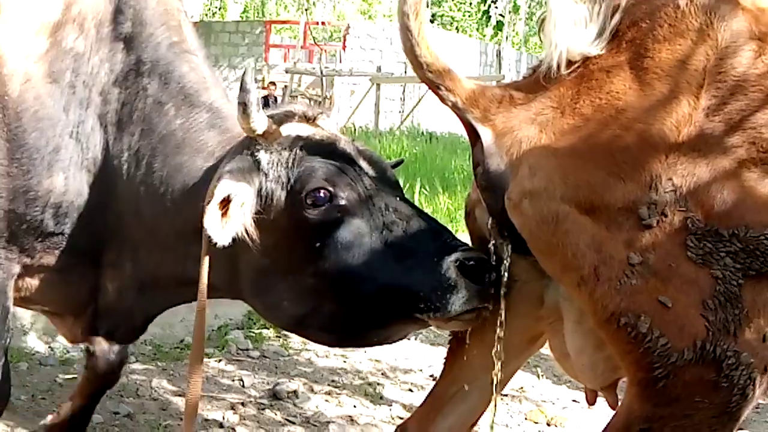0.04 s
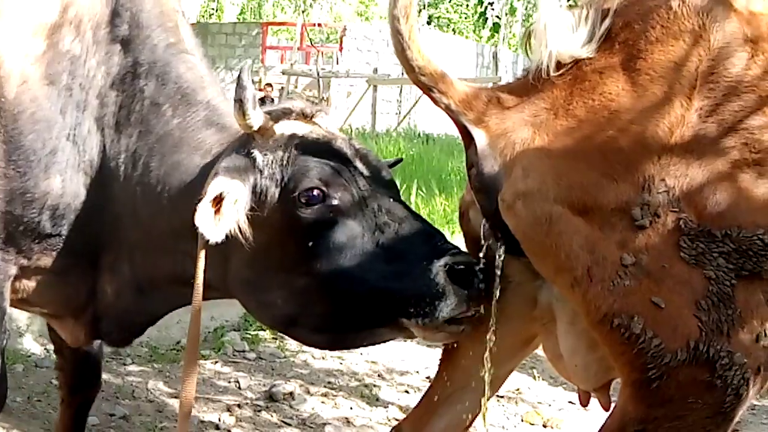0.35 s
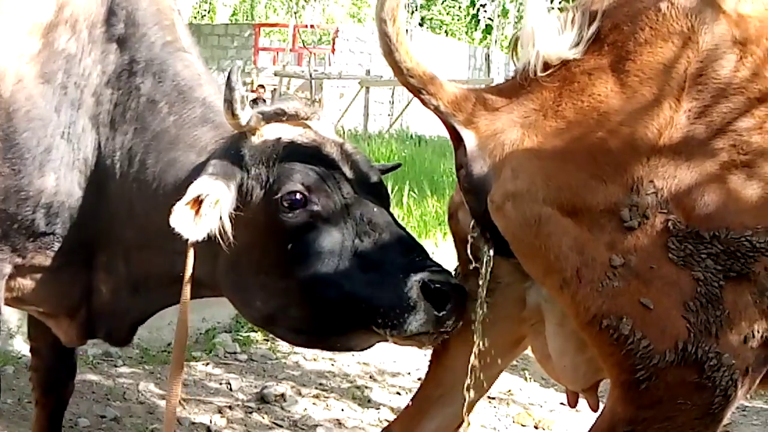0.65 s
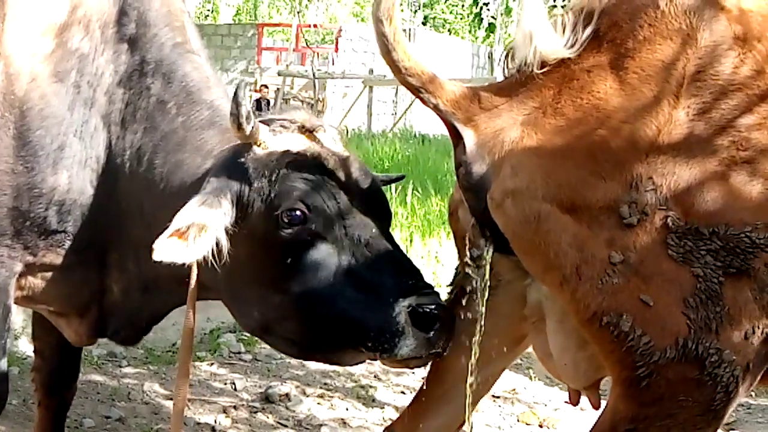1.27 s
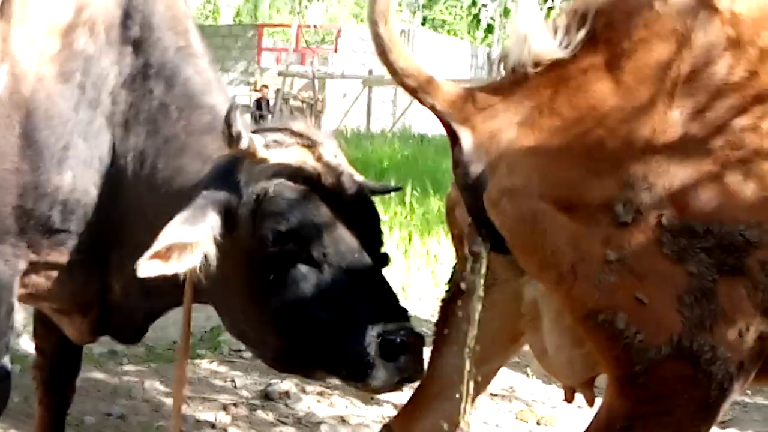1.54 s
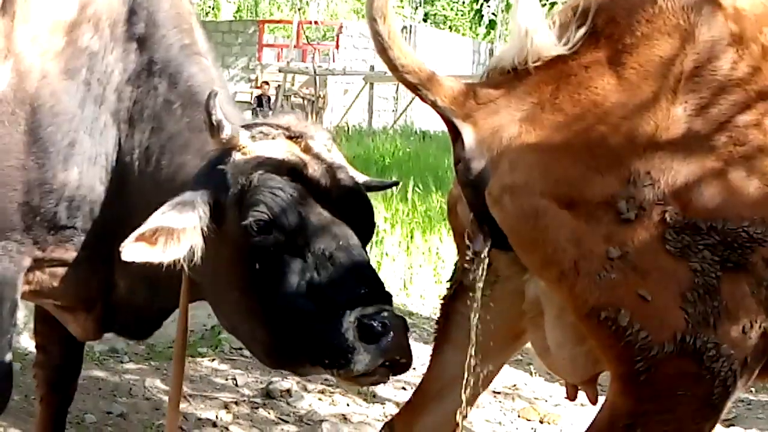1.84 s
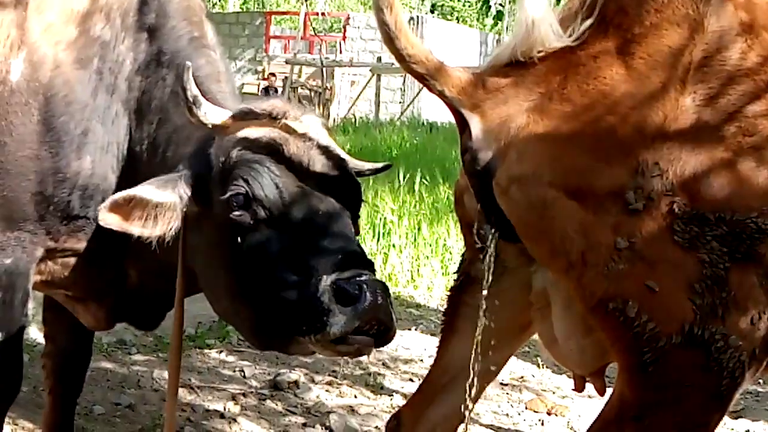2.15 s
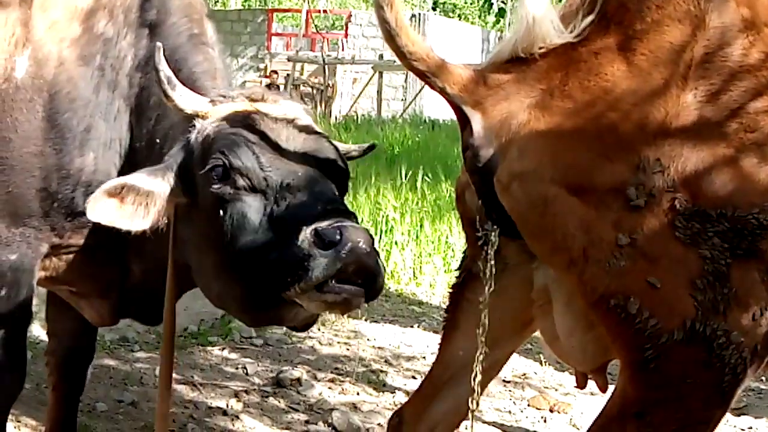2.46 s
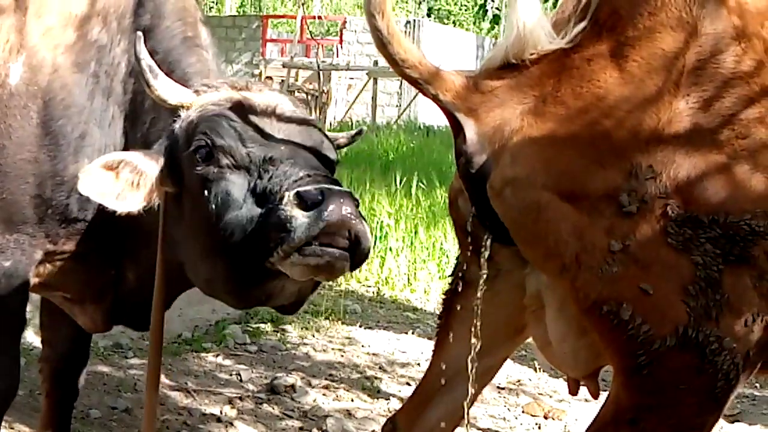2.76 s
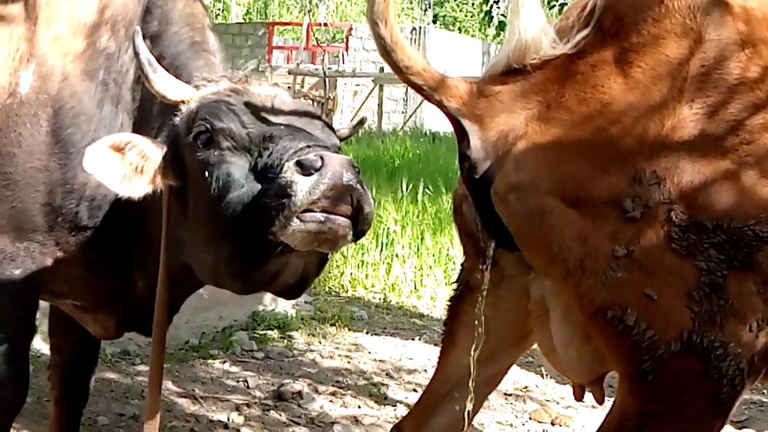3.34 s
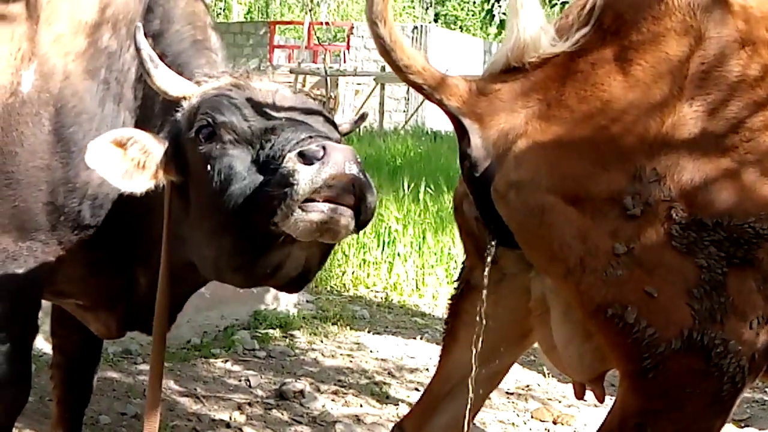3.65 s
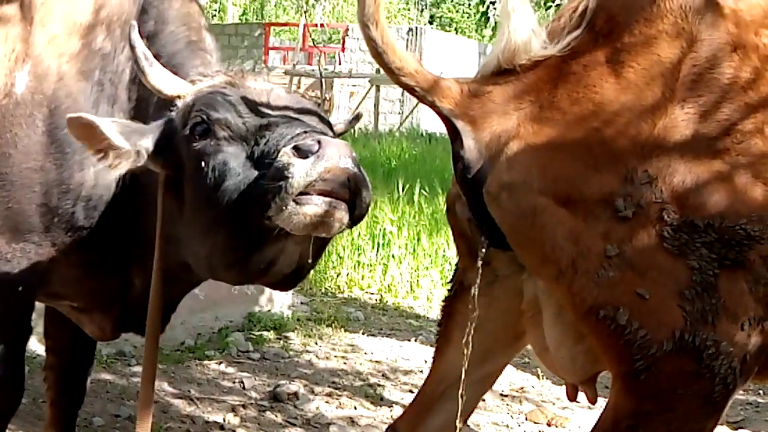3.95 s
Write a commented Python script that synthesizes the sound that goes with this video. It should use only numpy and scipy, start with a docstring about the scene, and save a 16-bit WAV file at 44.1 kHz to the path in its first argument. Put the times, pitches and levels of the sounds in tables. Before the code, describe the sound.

A cow urinates onto packed earth in a farmyard, heard close to the ground. The stream patters and splashes throughout, with fine spray, small plops and dull clicks, over faint cow puffs and a low rumble, easing at the end.

```python
"""A farmyard, one microphone close to the ground: a cow urinates onto the packed earth.
From the start the stream breaks into drops that smack on wet ground, throw fine spray and plop into
the puddle, over a faint low rumble; a near wall reflects the splashing. A second cow noses at the
stream, and the animals make soft puffs, shuffles and dull clicks. Spatter flares near 0.9 s, then come
a few bright bubble plinks. The puddle goes quiet around 3 s and returns; the flow eases at the end."""
import sys
import numpy as np
from scipy import signal
from scipy.fft import rfft, irfft
from scipy.io import wavfile

SR = 44100
rng = np.random.default_rng(int(sys.argv[2]) if len(sys.argv) > 2 else 0)


def persist_wave(psi):
    """Save psi, clipped to +-1, as 16-bit WAV."""
    counts = np.round(np.clip(psi, -1, 1) * 32767).astype(np.int16)
    wavfile.write(sys.argv[1], SR, np.atleast_2d(counts).T)


N = 176400
TIME = np.arange(N) / SR


def from_db(db):
    """Decibels to gain."""
    return 10 ** (np.asarray(db) / 20)


def unit_rms(x):
    """Scale to unit rms."""
    return x / np.sqrt(np.mean(x ** 2) + 1e-20)


def gain_curve(rows):
    """Gain over time from rows of time_s, level_db."""
    return from_db(np.interp(TIME, *np.transpose(rows)))


def swell(middle_s, half_s):
    """A bell-shaped rise and fall."""
    return np.exp(-.5 * ((TIME - middle_s) / half_s) ** 2)


def add(out, start_s, x):
    """Mix x in at start_s."""
    i = int(np.clip(start_s * SR, 0, N - 1))
    out[i:i + len(x)] += x[:N - i]


def lowpass(x, top_hz):
    """Gently dull the treble."""
    return signal.sosfilt(signal.butter(2, top_hz, fs=SR, output="sos"), x)


def colour(x, spectrum):
    """Causal (minimum-phase) filter that keeps the power of white noise."""
    size = 2 * N
    hz, db = np.transpose(spectrum)
    bin_hz = np.arange(N + 1) * SR / size
    gain = unit_rms(from_db(np.interp(np.log(bin_hz + 1), np.log(hz), db)))
    cepstrum = irfft(np.log(gain))
    cepstrum[1:N] *= 2
    cepstrum[N + 1:] = 0
    return irfft(rfft(x, size) * np.exp(rfft(cepstrum)))[:N]


def resonate(x, hz, width_hz):
    """One resonance, gain 1 at its peak."""
    radius = np.exp(-np.pi * width_hz / SR)
    feedback = [1, -2 * radius * np.cos(2 * np.pi * hz / SR), radius ** 2]
    return signal.lfilter(np.array([1, 0, -1]) * (1 - radius ** 2) / 2, feedback, x + 1e-18)


def grains(per_s, spread_db):
    """Random clicks of uneven size."""
    sizes = from_db(spread_db * np.minimum(rng.exponential(1, N), 4)) * rng.choice([-1, 1], N)
    return sizes * (rng.random(N) < per_s / SR)


def crackle(per_s, spread_db, decay_s):
    """Droplets landing at random, each a dying burst of noise."""
    t = TIME[:SR // 100]
    landings = grains(per_s, spread_db)
    burst = rng.standard_normal(len(t)) * np.exp(-t / decay_s)
    return unit_rms(signal.fftconvolve(landings, burst)[:N])


def ring(hz, width_hz, t):
    """A tone whose phase wanders as the water moves, blurring it to the given width."""
    wander = np.cumsum(rng.standard_normal(len(t))) * np.sqrt(2 * np.pi * width_hz / SR)
    return unit_rms(np.sin(2 * np.pi * hz * t + wander))


def smack(pitch_hz, width_hz=1470, ring_share=0.8, decay_s=0.0043):
    """One drop hits wet earth: a sudden short burst, mostly ringing at its own pitch."""
    t = TIME[:SR // 60]
    noise = np.sqrt(1 - ring_share) * rng.standard_normal(len(t))
    tone = np.sqrt(ring_share) * ring(pitch_hz, width_hz, t)
    return (noise + tone) * np.exp(-(t / decay_s) ** 0.97)


# Strength of the stream: time_s, level_db
STREAM_FLOW = [(0.0, -52), (0.25, -52.5), (0.3, -51.5), (0.96, -52.5), (1.4, -55), (1.9, -52), (2.66, -54),
               (3.26, -53.5), (3.88, -55), (4.0, -60.5)]
# Heavy drops on the earth: start_s, relative_level_db, pitch_hz
HEAVY_DROPS = [(0.0443, -41, 5170), (0.1234, -42, 5070), (0.2742, -32, 6400), (0.3005, -36, 5000),
               (0.3232, -33.5, 5870), (0.415, -26.5, 3594), (0.499, -33, 4320), (0.5476, -32, 5640),
               (0.616, -28, 3330), (0.638, -32.5, 6370), (0.6779, -35, 5770), (0.7147, -35.5, 3440),
               (0.7913, -37, 6180), (0.807, -35, 6400), (0.837, -28.5, 4960), (0.8974, -34, 6340),
               (0.9673, -36.5, 5100), (1.0113, -29, 4220), (1.0503, -31.5, 6570), (1.1247, -32.5, 5040),
               (1.1706, -34, 4520), (1.2252, -36.5, 6330), (1.271, -32, 6010), (1.3717, -40, 5000),
               (1.4177, -40.5, 6450), (1.4703, -36.5, 4270), (1.542, -39, 5540), (1.5651, -30, 6320),
               (1.6373, -23, 4030), (1.65, -34, 5700), (1.692, -34, 4360), (1.828, -35, 4340),
               (1.8422, -23.5, 5896), (2.0698, -41, 5800), (2.1198, -35.5, 4230), (2.1898, -32, 5620),
               (2.2116, -36.5, 5100), (2.236, -34, 3330), (2.268, -32, 6170), (2.413, -31.5, 4670),
               (2.4495, -35.5, 4820), (2.4784, -25, 5780), (2.5327, -32.5, 5260), (2.5885, -29, 4790),
               (2.61, -40, 5030), (2.6503, -36, 6550), (2.781, -36, 6070), (2.9274, -36.5, 6140),
               (2.961, -29, 4410), (3.0767, -27, 5580), (3.1546, -32, 6470), (3.1752, -32.5, 6240),
               (3.3567, -33, 6120), (3.4254, -30.5, 5780), (3.4617, -34, 5500), (3.692, -35.5, 6440),
               (3.7516, -35.5, 6300)]
# Tone of the splash on wet ground: frequency_hz, relative_level_db
SPLASH_SPECTRUM = [(300, -34), (650, -26), (1400, -7.5), (1700, -14.5), (2300, -6), (2800, -9), (3350, -3),
                   (3750, -7), (4400, -2.5), (5800, -1.5), (6500, 0), (7100, -8), (8500, -16.5),
                   (10000, -17), (11700, -29), (14000, -17), (15000, -2.5), (16000, -13)]


def stream(drops_per_s=76, low_hz=3040, high_hz=7224):
    """Close to the microphone, heavy drops, ordinary ones and a mist of droplets strike the ground."""
    mist = from_db(-7) * crackle(per_s=900, spread_db=2.5, decay_s=0.0014)
    hiss = from_db(-7.5) * rng.standard_normal(N)
    spatter = unit_rms(grains(per_s=4000, spread_db=3.9)) * spatter_strength()
    heavy, ordinary = np.zeros(N), np.zeros(N)
    for start_s, level_db, pitch_hz in HEAVY_DROPS:
        add(heavy, start_s, from_db(level_db - 12.5) * smack(pitch_hz))
    for k, (jitter, pitch_draw, size_draw) in enumerate(rng.random((int(drops_per_s * N / SR), 3))):
        start_s = (k + 2 * jitter - 1) / drops_per_s   # a loose train, up to one gap early or late
        level_db = -0.5 + 3 * min(-np.log(size_draw), 2.2)
        pitch_hz = low_hz * (high_hz / low_hz) ** pitch_draw
        add(ordinary, start_s, from_db(level_db) * smack(pitch_hz))
    patter = gain_curve(STREAM_FLOW) * (ordinary + lowpass(mist + hiss, top_hz=8300))
    return colour(heavy + spatter + patter, SPLASH_SPECTRUM)


# Tone of the fine spray: frequency_hz, relative_level_db
SPRAY_SPECTRUM = [(4000, -41), (7500, -7.5), (9700, -10.5), (11700, -17), (14000, -8.5), (15000, 6.5),
                  (16000, -5.5)]
# Sharpest ticks of the spray: start_s, level_db, pitch_hz
SPRAY_TICKS = [(.547, -51, 9500), (1.051, -50, 9500), (1.65, -45, 15200), (1.843, -43, 15400),
               (1.8565, -38, 15000), (2.19, -43, 15300), (2.237, -44, 15200), (2.796, -48.5, 9600),
               (3.206, -42, 15400), (3.652, -44.5, 15400), (3.752, -52.5, 9700)]


def spray(decay_s=0.0022, width_hz=950):
    """Tiny droplets thrown up by the splash land around it as separate sharp ticks."""
    t = TIME[:SR // 100]
    strength = gain_curve(STREAM_FLOW) + from_db(-8) * spatter_strength()
    droplets = crackle(per_s=450, spread_db=5, decay_s=decay_s)
    out = from_db(-16) * strength * colour(droplets, SPRAY_SPECTRUM)
    for start_s, level_db, pitch_hz in SPRAY_TICKS:
        tick = ring(pitch_hz, width_hz, t) * np.exp(-t / decay_s)
        add(out, start_s, from_db(level_db) * resonate(tick, pitch_hz, 2 * width_hz))
    return out


# Low patter of the puddle: time_s, relative_level_db
PUDDLE_PATTER = [(0, -63.5), (.12, -58.5), (.35, -68), (.62, -65), (.75, -70), (1.35, -68), (1.5, -65),
                 (1.95, -62.5), (2.25, -67), (2.62, -65.5), (2.9, -88), (3.5, -81), (3.75, -63), (4, -82)]


def puddle(bubble_q=9.6):
    """Small bubbles ring briefly in the puddle under the cow, each at one of sixteen pitches."""
    pitches_hz = np.geomspace(560, 1550, 16)
    clicks = grains(per_s=420, spread_db=4.3)
    pitch_index = rng.integers(0, len(pitches_hz), N)
    bubbles = sum(resonate(clicks * (pitch_index == k), hz, hz / bubble_q) / hz
                  for k, hz in enumerate(pitches_hz))
    return from_db(-3.5) * gain_curve(PUDDLE_PATTER) * unit_rms(bubbles)


# Strength of the background rumble: time_s, level_db
RUMBLE_LEVEL = [(0.0, -66), (0.5, -67), (0.95, -67), (1.45, -75), (1.53, -68), (2.85, -69.5), (2.9, -73.5),
                (3.5, -75), (3.64, -62), (3.72, -70), (4.0, -76)]
# Tone of the rumble: frequency_hz, relative_level_db
RUMBLE_SPECTRUM = [(20, -31), (50, -17.5), (75, -13), (100, 2.5), (112, -2), (124, 4), (145, -3.5),
                   (200, -14), (300, -22), (1000, -30), (4000, -56)]


def rumble():
    """A faint, wavering low background lies under the farmyard."""
    return gain_curve(RUMBLE_LEVEL) * unit_rms(colour(rng.standard_normal(N), RUMBLE_SPECTRUM))


def yard_echoes(x, delay_s=0.007, decay_s=0.026, wall_delay_s=0.013):
    """Ground, animals and a near wall reflect sound to the microphone, its top absorbed."""
    t = TIME[:SR // 4]
    wall = from_db(-8.5) * swell(wall_delay_s, half_s=0.0017)[:len(t)]
    echoes = rng.standard_normal(len(t)) * (np.exp(-t / decay_s) + wall) * (t > delay_s)
    echoes /= np.sqrt(np.sum(echoes ** 2))
    return lowpass(signal.fftconvolve(x, echoes)[:N], top_hz=11100)


# Duller clicks and plops: start_s, level_db, pitch_hz, decay_s
DULL_PLOPS = [(.093, -52, 675, 0.0035), (.888, -41.5, 656, 0.003), (.887, -46, 1330, 0.0047),
              (1.176, -51.5, 1234, 0.014), (1.637, -47.5, 996, 0.0042), (1.918, -43.5, 2490, 0.0034),
              (2.48, -54, 670, 0.0094), (2.613, -53.5, 714, 0.008), (2.783, -47, 1733, 0.0047),
              (3.077, -37.5, 1242, 0.0033), (3.077, -45.5, 2176, 0.0071), (3.091, -46.5, 1440, 0.0032),
              (3.4615, -35.5, 2316, 0.0028), (3.4619, -44, 1510, 0.0026), (3.468, -47.5, 2010, 0.0072)]


def plops():
    """Plops in the puddle and the animals' dull clicks: each a dying burst in one broad resonance."""
    out, t = np.zeros(N), TIME[:SR // 12]
    for start_s, level_db, pitch_hz, decay_s in DULL_PLOPS:
        width_hz = 0.23 * pitch_hz
        tone = unit_rms(resonate(ring(pitch_hz, width_hz, t), pitch_hz, 2 * width_hz))
        add(out, start_s, from_db(level_db) * tone * np.exp(-t / decay_s))
    return out


# Puffs and shuffles of the cows: middle_s, half_length_s, level_db, top_hz
COW_PUFFS = [(0.148, 0.063, -66, 900), (0.498, 0.055, -52, 560), (0.928, 0.045, -66.5, 590),
             (1.481, 0.027, -65, 710), (1.955, 0.056, -65.5, 825), (3.674, 0.12, -77.5, 800)]
# Tone of the puffs: frequency_hz, relative_level_db
PUFF_SPECTRUM = [(40, -33), (120, -2), (200, -3), (290, -7.5), (400, -6.5), (700, -11), (1400, -8),
                 (3000, -17)]


def cattle():
    """The two cows puff and shuffle nearby: soft swells of low noise."""
    air = colour(rng.standard_normal(N), PUFF_SPECTRUM)
    return sum(from_db(level_db) * swell(middle_s, half_s) * unit_rms(lowpass(air, top_hz))
               for middle_s, half_s, level_db, top_hz in COW_PUFFS)


# Runs of fine spatter: middle_s, half_length_s, level_db
SPATTER_RUNS = [(0.872, 0.015, -44.5), (1.87, 0.044, -57), (3.222, 0.061, -52.5)]


def spatter_strength():
    """Fine spatter flares briefly: a gain over time for both splash and spray."""
    return sum(from_db(level_db) * swell(middle_s, half_s) for middle_s, half_s, level_db in SPATTER_RUNS)


# Bright bubble plinks: start_s, level_db, start_pitch_hz
BUBBLE_PLINKS = [(1.178, -33.5, 4520), (1.372, -38, 4780), (1.842, -35.5, 6080), (3.078, -30, 6140)]


def plinks(decay_s=0.0037, rise_share=0.085):
    """A trapped bubble rings brightly and rises in pitch as it nears the surface."""
    out, t = np.zeros(N), TIME[:SR // 25]
    envelope = np.exp(-t / decay_s)
    for start_s, level_db, start_pitch_hz in BUBBLE_PLINKS:
        pitch_hz = start_pitch_hz * (1 + rise_share * (1 - envelope))
        add(out, start_s, from_db(level_db) * envelope * np.sin(2 * np.pi * np.cumsum(pitch_hz) / SR))
    return out


def scene():
    """At the microphone, in mono: the splashing, its reflections, the cows and the rumble."""
    splashing = stream() + spray() + puddle() + plinks() + plops()
    return (splashing + from_db(-7) * yard_echoes(splashing) + cattle() + rumble())[None]


def record(dry, cutoff_hz=16100):
    """The microphone's signal is cut steeply at the very top."""
    return signal.sosfilt(signal.ellip(10, .5, 80, cutoff_hz, fs=SR, output="sos"), dry)


dry = scene()
out = record(dry)
persist_wave(out)
```